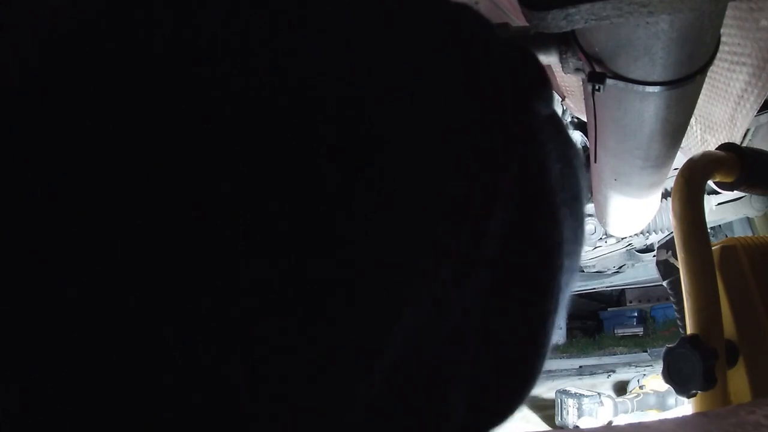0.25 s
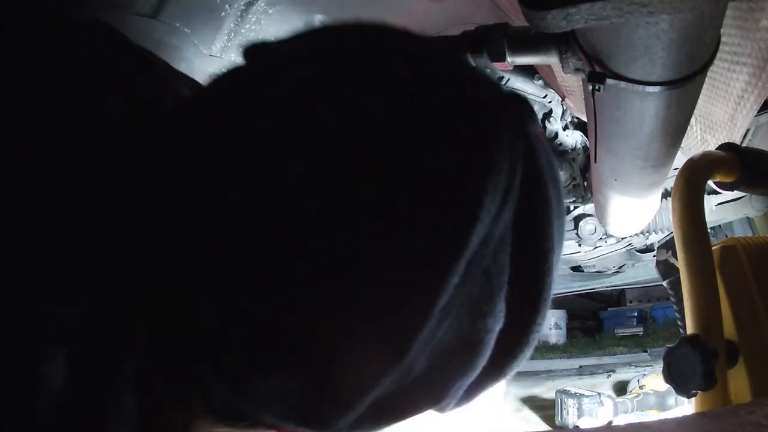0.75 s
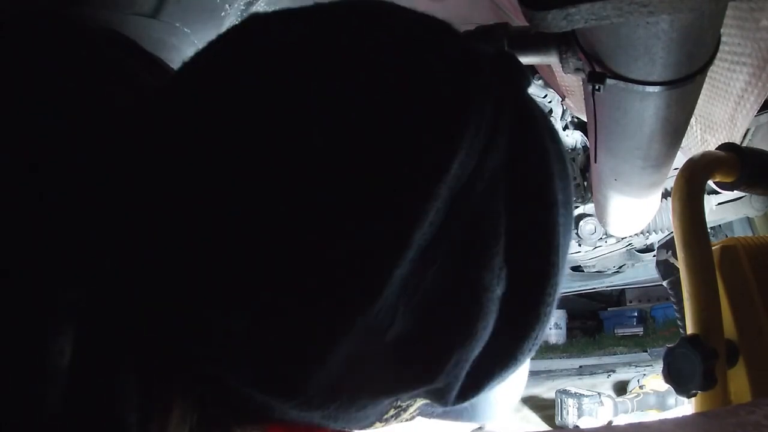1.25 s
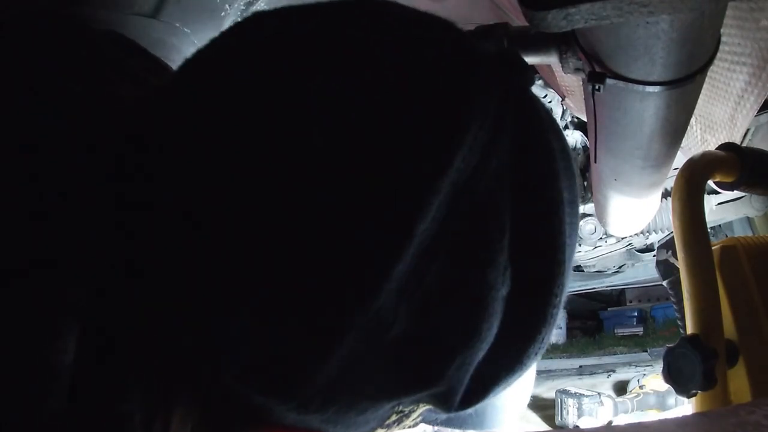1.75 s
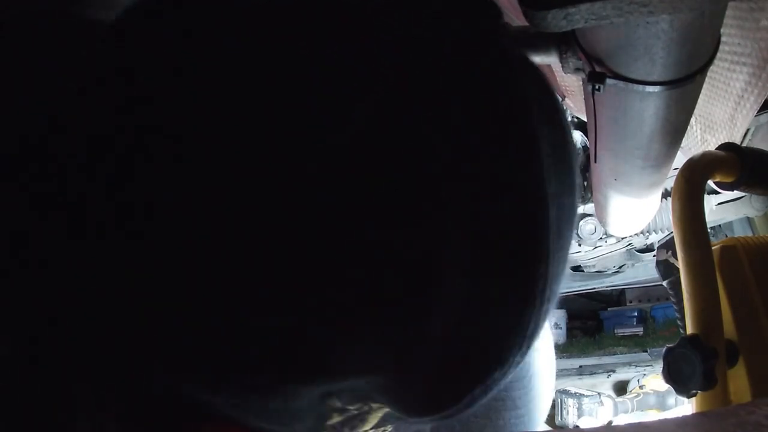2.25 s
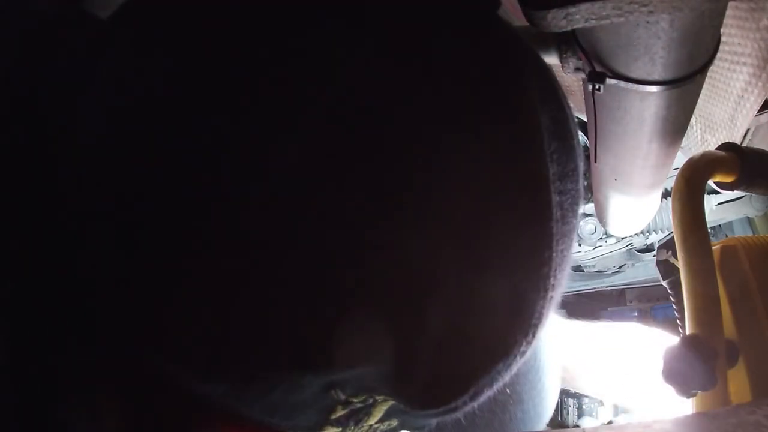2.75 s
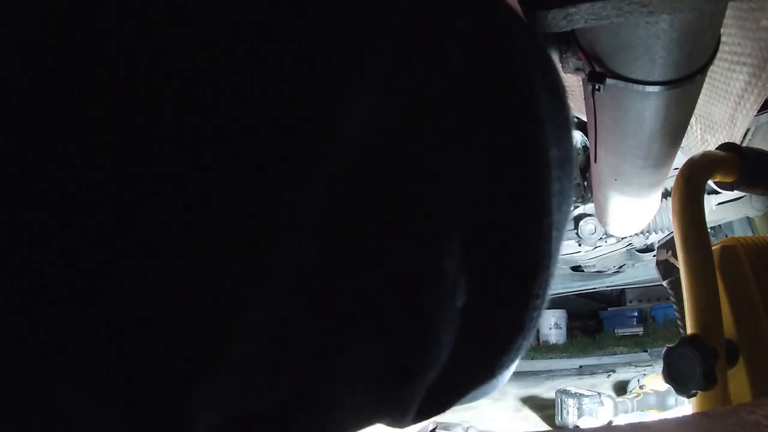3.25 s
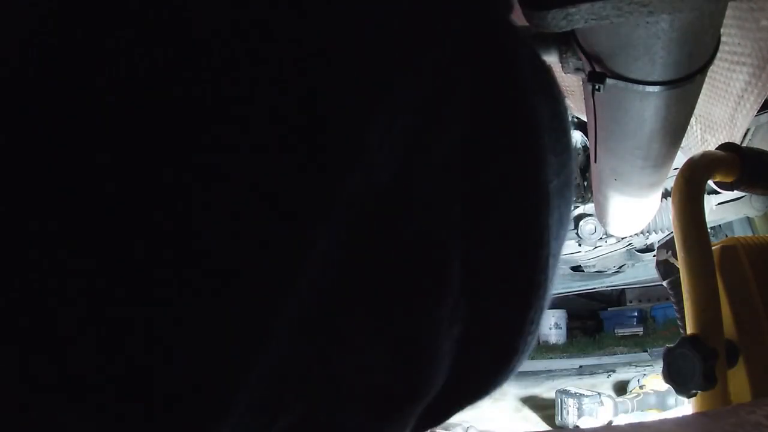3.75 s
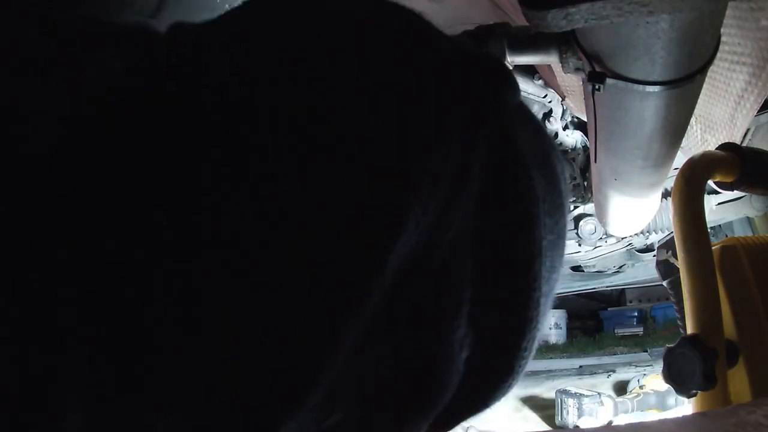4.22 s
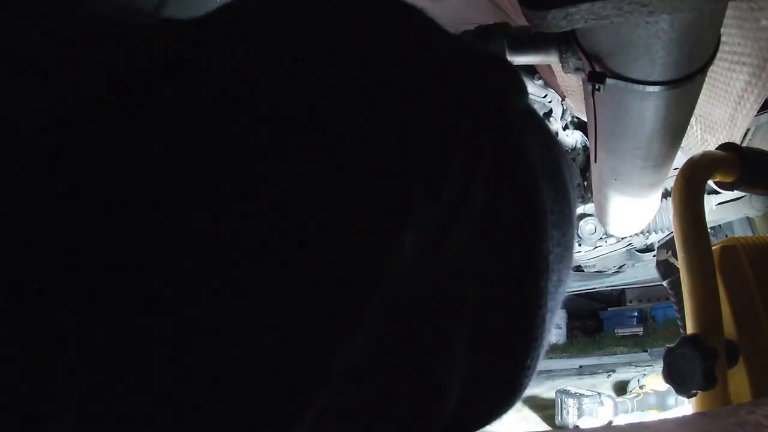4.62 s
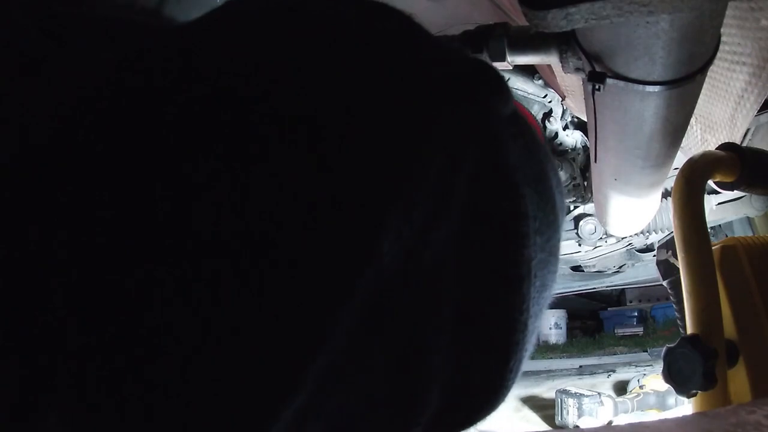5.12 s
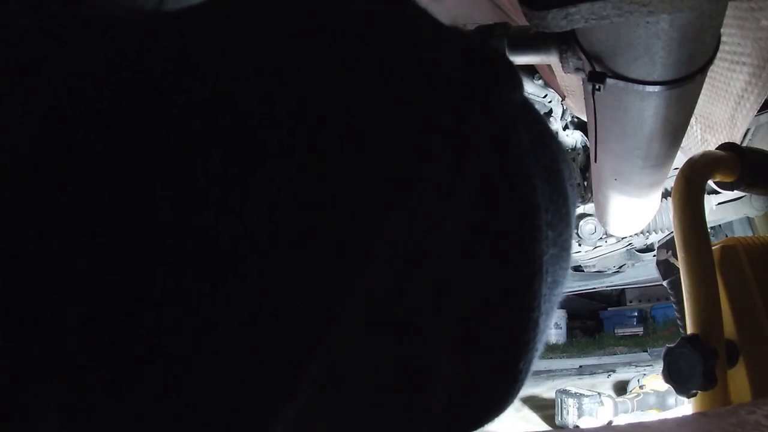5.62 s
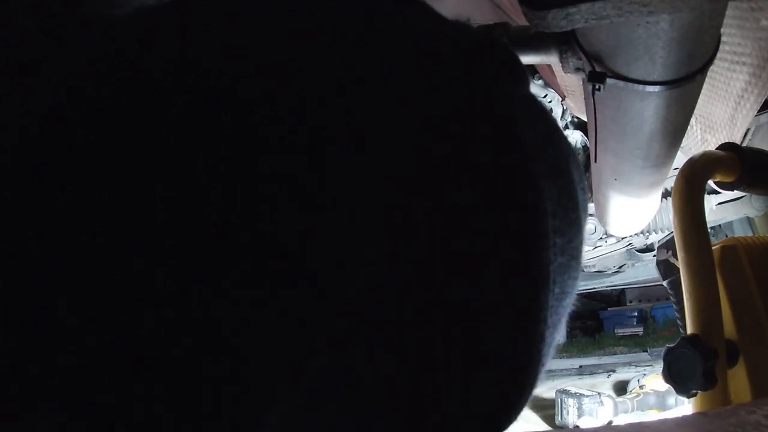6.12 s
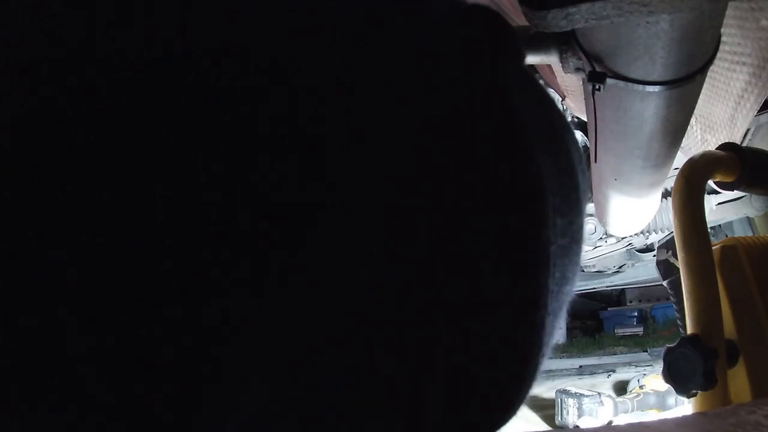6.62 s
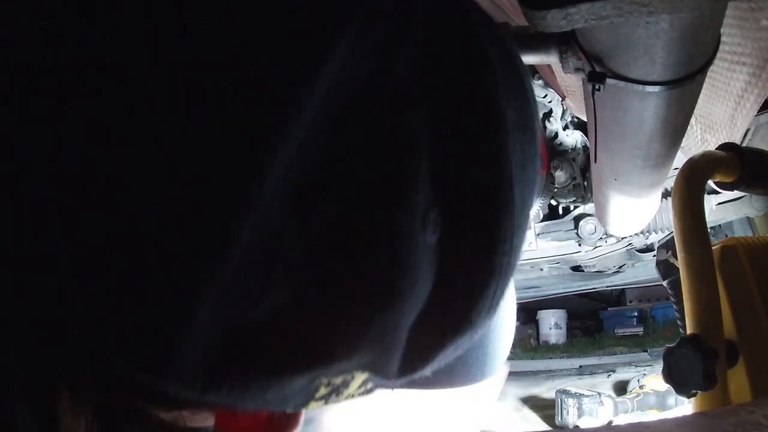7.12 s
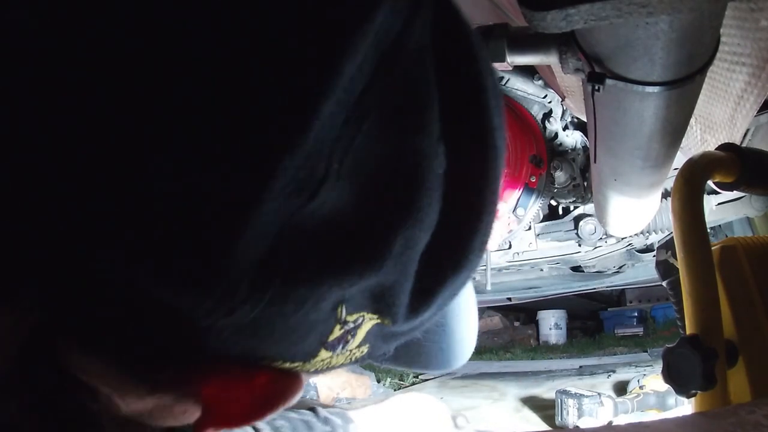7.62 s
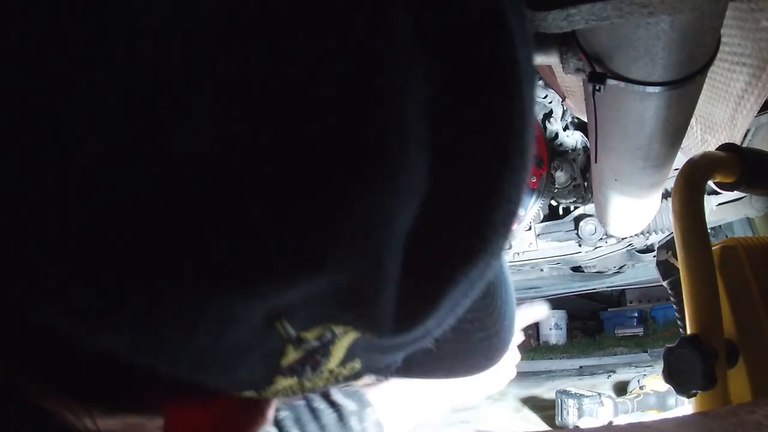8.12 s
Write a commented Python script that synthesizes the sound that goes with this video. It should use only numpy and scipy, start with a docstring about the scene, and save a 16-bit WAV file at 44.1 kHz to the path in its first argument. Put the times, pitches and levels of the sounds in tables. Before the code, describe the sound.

A heavy metal part scrapes and bangs into place under a car, then a wrench pings on a fitting over low engine drone.

```python
"""A heavy part is shifted and knocked into place under a car in a garage, then a wrench taps on a fitting.
Blows are sums of decaying modes and short noise bursts; sliding, grinding and cloth are shaped noise.
Near surfaces throw the taps straight back, and the garage adds a short diffuse tail.
Far engines are low harmonic tones, one sinking slowly in pitch, another passing and changing gear,
over filtered noise for ebbing traffic rumble and faint air noise."""
import sys
import numpy as np
from scipy import signal
from scipy.fft import rfft, irfft
from scipy.io import wavfile
from scipy.ndimage import uniform_filter1d

SR = 44100
rng = np.random.default_rng(int(sys.argv[2]) if len(sys.argv) > 2 else 0)


def unload_audio(sound):
    """Save the sound as a 16-bit wav file, at the path given as the first command line argument."""
    columns = np.transpose(np.atleast_2d(sound))
    # keep every value between -1 and 1, then stretch to whole-number steps
    steps = np.round(np.clip(columns, -1, 1) * 32767)
    wavfile.write(sys.argv[1], SR, steps.astype(np.int16))


N = 369305
TIME = np.arange(N) / SR  # [s]
AGE = np.arange(SR // 2) / SR  # time since a blow [s]
ATTACK_SAMPLES = 441  # the first 10 ms of a blow, where its level is set

# far droning engine: (time [s], level before DRONE_TRIM_DB [dB])
DRONE_LEVEL = [(0.1, -36.5), (0.42, -29), (2.56, -31), (2.59, -37.5), (3.99, -25.5), (5.4, -30.5),
               (6.83, -43), (6.87, -36), (8.37, -37.5)]
DRONE_TRIM_DB = -1
DRONE_HZ, SAG_HZ_PER_S = 77.4, 1.14  # it slows evenly
# passing vehicle: it revs up, drops into the next gear and picks up slowly
LOW_GEAR_HZ, LOW_GEAR_HZ_PER_S = 107.7, 12.8
SHIFT_S, SHIFT_LENGTH_S = 3.2, 1
HIGH_GEAR_HZ, HIGH_GEAR_HZ_PER_S = 99.1, 1.3
NEAREST_S, PASS_S = 3.936, 0.15  # when it is nearest; time from there to 3 dB less
PASS_DB, PASS_RUMBLE_DB = -30, -34.5  # what nearness adds to its note and to the rumble, at most
FAR_DB = -43.5  # its note from afar, at the start
TRAFFIC_DB, AIR_DB = -32, -53.5  # rumble and air noise at the start
TRAFFIC_FADE_DB_PER_S, AIR_FADE_DB_PER_S = 1.15, 0.95  # both ebb as the traffic moves off
# spectra of the traffic rumble and of the air noise: (frequency [Hz], level [dB])
RUMBLE_COLOUR = [(20, -34), (40, -13), (55, -2), (92, 8.5), (125, -2), (155, 0.5), (200, -8.5),
                 (270, -20.5), (400, -30.5), (800, -34.5), (2000, -86.5)]
AIR_COLOUR = [(180, -15.5), (300, -3.5), (620, -20.5), (1000, -11), (1600, -20.5), (3000, -33.5),
              (5500, -41.5), (8000, -63), (10000, -51), (15000, -65.5)]

# strokes of a sleeve: (start [s], end [s], level [dB], treble against body [dB])
BRUSHES = [(-.5, .58, -54.5, -52), (0.534, 0.71, -49.5, -34), (0.602, 1.7, -54.5, -43),
           (1.064, 1.266, -50, -28), (2.08, 2.59, -62.5, -12.5), (4.9, 5.113, -59.5, -24),
           (6.47, 6.623, -63, -14), (7.018, 7.985, -50, -13), (7.75, 8.35, -66.5, -12.5),
           (7.18, 7.33, -46.5, -13.5), (7.385, 7.704, -46, -14), (8.16, 8.276, -62.5, -5),
           (8.247, 8.54, -55, -8)]
# pushes that slide the part: (start [s], end [s], level [dB], treble against body [dB])
SLIDES = [(1.429, 1.62, -35.5, -28), (1.613, 1.77, -40.5, -25.5), (1.773, 1.92, -37.5, -32.5),
          (1.898, 2.097, -38, -22.5), (2.049, 2.131, -26, -25), (2.1, 2.247, -51, -16)]
# spectra of cloth and of sliding metal: (frequency [Hz], level [dB])
CLOTH_COLOUR = [(150, -8), (330, 1), (550, -11), (800, -0.5), (1300, -10.5), (1800, -8.5), (3500, -20),
                (6500, -23.5), (8000, -31.5), (10300, -26), (11800, -43.5), (15000, -42)]
SCRAPE_COLOUR = [(150, -18.5), (250, -7), (335, 16), (450, 4), (600, -7.5), (720, 7), (820, 6.5),
                 (1000, -3), (1200, -8.5), (2000, -14), (3000, -12.5), (4400, -24.5), (6700, -21),
                 (8000, -34.5), (10000, -28.5), (12000, -44), (15000, -54)]
# each catch of a rubbing surface sounds in one of these bands: (from [Hz], to [Hz])
CATCH_BANDS = [(30, 600), (600, 1300), (1300, 2300), (2300, 3400), (3400, 5000), (5000, 7500),
               (7500, 17000)]

# light touches of small steel parts: (time [s], level [dB], centre of their ring [Hz])
TICKS = [(.06, -52, 2470), (1.722, -47.5, 2820), (1.738, -47.5, 1670), (1.856, -38.5, 2970),
         (1.905, -48, 2530), (1.935, -46.5, 3470), (1.954, -50, 2430), (2.043, -40.5, 2600),
         (2.551, -53, 5200), (5.802, -53, 1960), (5.916, -62.5, 2030)]
TICK_T60_S, TICK_SKIRT_DB = 0.1, -14.5  # decay; level a third of an octave from the centre

# soft low thumps: (time [s], length [s], level [dB])
NUDGES = [(0.52, 0.21, -36), (1.4, 1, -39), (7.554, 0.48, -38.5)]
# spectrum of the thumps: (frequency [Hz], level [dB])
NUDGE_COLOUR = [(15, -11.0), (40, -8.0), (65, -11.0), (150, -16.0), (500, -49.0), (2000, -98.5)]

# dull blows of the heavy part: (time [s], level [dB], brightness [dB per octave])
KNOCKS = [(0.536, -39, 5), (0.854, -31, -5.5), (1.435, -49, 0), (1.502, -31, -1.5), (1.529, -18.5, 3),
          (1.578, -23, -11), (1.605, -28, -1.5), (1.62, -20, 2.5), (1.712, -30, 2), (1.736, -31, -3),
          (1.816, -29.5, -3), (1.973, -21.5, 4.5), (2.5288, -9.5, 1), (2.599, -17, -1.5),
          (2.7205, -23.5, 1.5), (2.762, -17.5, 11), (2.7759, -20.5, 1), (2.809, -36.5, 9),
          (2.893, -17.5, 1), (2.983, -31.5, -1.5), (7.214, -35.5, 6.5), (7.305, -29, 4),
          (7.646, -36.5, 2.5), (7.719, -32, -1.5)]
# spectrum of a dull blow: (frequency [Hz], level [dB])
KNOCK_COLOUR = [(50, -18), (110, 0), (170, 4.5), (230, -3), (330, 7.5), (490, -5.5), (660, -13),
                (760, -3.5), (1020, -15), (1500, -28.5), (2500, -40.5), (4000, -58.5), (8000, -76),
                (15000, -100)]
# body resonances of the part: (frequency [Hz], level [dB], T60 [s])
PART_MODES = [(172, -1, .25), (235, -5, .38), (310, -4, .16), (326, 0, .16), (420, -7, .16), (474, -1, .18),
              (558, -6, .22), (724, -5, .16), (775, -8, .09), (836, -7, .13), (1015, -8, .1),
              (1095, -12, .07)]
KNOCK_T60_S = 0.064

# hard contacts of metal on metal: (time [s], level [dB], brightness [dB per octave], T60 of the crack [s])
CLACKS = [(1.572, -35.5, 0.5, 0.19), (1.6005, -19, -1, 0.082), (1.855, -35.5, 0, 0.084),
          (2.158, -28.5, 1, 0.066), (2.529, -50, 13.5, 0.11), (2.549, -45.5, 6.5, 0.059),
          (2.601, -57, 15, 0.13), (2.7207, -27.5, 4, 0.062), (2.7434, -38, 6.5, 0.047),
          (2.762, -36, 7, 0.12), (2.7768, -24.5, -3.5, 0.013), (2.894, -34, -0.5, 0.096),
          (2.9101, -28.5, 6.5, 0.045), (2.99, -46.5, 0.5, 0.089), (7.188, -43, 3, 0.073),
          (7.217, -49, -5, .045), (7.306, -43, -10, 0.063), (7.45, -40.5, -4, 0.063),
          (7.526, -45, 7, 0.077), (7.721, -49, 4, 0.14)]
# spectrum of a hard contact: (frequency [Hz], level [dB])
CLACK_COLOUR = [(100, -49), (400, 13), (600, 8), (800, 12), (1200, 6.5), (1900, -0.5), (2600, 3),
                (4200, -8), (5500, -12.5), (6800, -10.5), (8000, -28), (10000, -19.5), (12000, -38),
                (15000, -43.5)]
# edge resonances of the part, before detuning: (frequency [Hz], level [dB], T60 [s])
CLACK_MODES = [(1020, 1, .1), (1545, -4, .13), (1728, 0, .09), (2008, -5, .11), (2430, -4, .11),
               (2640, -1, .095), (3010, -3, .1), (3429, -6, .08), (5250, -10, .07), (6750, -8, .06),
               (9800, -16, .05)]
EDGE_DETUNE = .025  # standard deviation, as a fraction of each frequency

# a steel tool that rings when touched, until a hand stops it: (time [s], level [dB], free time [s])
CLINKS = [(1.602, -27, 0.11)]
# resonances of that tool: (frequency [Hz], level [dB], T60 [s])
TOOL_MODES = [(1712, -5, .11), (2272, -3, .7), (2392, -13, .2), (3535, 0.5, .17), (4129, -17, .15),
              (5035, -1, .13), (9383, -23, .18), (10655, -29, .18)]
GRAB_T60_S = 0.036  # extra decay once the hand stops it

# a metal edge grinds along another: (time [s], length [s], level [dB])
GRINDS = [(1.846, 0.059, -50.5), (2.916, 0.094, -57)]
# spectrum of the grinding: (frequency [Hz], level [dB])
GRIND_COLOUR = [(300, -28), (2100, -19), (2420, 0), (2700, -4), (3500, -24), (5400, -18), (14000, -48)]

# the part lands flat and its face swings: (time [s], level before decay and onset [dB], pitch [Hz])
SLAPS = [(2.530, -0.5, 890), (2.7613, -10.5, 1040), (2.7766, -4, 970)]
SLAP_T60_S = 0.012

# brief pure tones of ringing steel, as when the wrench is set on the fitting:
# (time [s], length [s], pitch [Hz], peak level [dB])
STEEL_TONES = [(2.885, 0.055, 2550, -51), (2.949, 0.083, 2344, -65), (2.994, 0.015, 2400, -43),
               (5.223, .13, 726, -55.5)]

# wrench on the fitting: (time [s], blow level [dB], brightness [dB per octave],
# partial that the spot struck brings out [Hz], ring level [dB], free time [s])
TAPS = [(4.561, -39, -7.5, 3330, -27.5, 0.057), (4.613, -48.5, -9.5, 1140, -31, 0.022),
        (4.694, -62, -7.5, 1140, -44, 0.12), (4.779, -49, -6, 1150, -36, 0.11),
        (4.874, -52, -9, 3280, -40.5, 0.088), (5.028, -58.5, -5.5, 1140, -46.5, .05),
        (5.137, -31, 1.5, 5070, -24.5, 0.046), (5.202, -51, -4.5, 3320, -46.5, 0.038),
        (5.361, -62.5, -4, 2370, -62, 0.047), (5.659, -27.5, -2, 1810, -25.5, 0.052),
        (5.916, -64.5, -8.5, 2330, -52.5, 0.032), (6.078, -31.5, -2.5, 1336, -20.5, 0.03),
        (6.118, -38, -4.5, 1150, -29.5, 0.057), (6.33, -39.5, -2.5, 2400, -31.5, 0.047)]
# spectrum of a tap: (frequency [Hz], level [dB])
TAP_COLOUR = [(100, -24), (330, -8), (520, -17.5), (720, -5.5), (890, -12.5), (1100, 0.5), (1950, 2.5),
              (2600, -2.5), (3800, -7.5), (5000, -6.5), (6500, -8.5), (8000, -19), (10000, -16),
              (12500, -38), (15000, -43.5)]
# resonances of the wrench and of the fitting: (frequency [Hz], level [dB], T60 [s])
WRENCH_MODES = [(1112, -7, .1), (1143, 4, .19), (1325, -8, .1), (1405, -7, .1), (1508, -5, .13),
                (1676, -4, .2), (2020, -9, .08), (2132, -7, .1), (2376, 1, .19), (3140, -12, .1),
                (3305, -13, .11), (3362, -9, .12), (4090, -13, .08), (4462, -7, .095), (4938, -6, .095),
                (5320, -12, .08), (6160, -11, .08), (6345, -7, .09), (6944, -17, .08)]
FITTING_MODES = [(2545, -2, .32), (2627, -1, .33), (2681, 0, .31), (2719, -3, .35), (2785, -1, .32),
                 (2832, 0, .28), (2929, -3, .3)]
TAP_T60_S, GRIP_T60_S = 0.091, .17  # decay of the blow; extra decay of the wrench once gripped
SPOT_DB, SPOT_OCTAVES = 9.5, 0.19  # boost of the partial at the spot struck, and its half-width to 1/e
FITTING_DB = -16.5  # shimmer of the fitting against the blow
# near surfaces that throw the taps back: (delay [s], gain [linear])
BOUNCES = [(.0027, .35), (.0106, .5)]
# each bounce loses some treble: (frequency [Hz], level [dB])
BOUNCE_COLOUR = [(1000, 2.5), (5000, 0), (12000, -19.5)]

# decay of the diffuse tail: (frequency [Hz], T60 [s])
GARAGE = [(100, 0.26), (300, 0.22), (800, 0.09), (2700, 0.096), (6000, 0.027), (12000, 0.064)]
EDGE_HZ = 15000  # upper band edge


def amp(db):
    """Amplitude ratio of a level in decibels."""
    return 10 ** (np.asarray(db) / 20)


def unit(x):
    """Normalises a signal to rms 1."""
    return x / np.sqrt(np.mean(x ** 2) + 1e-20)


def read(points, hz):
    """Interpolates a spectrum on a logarithmic frequency axis."""
    f, value = np.transpose(points)
    return np.interp(np.log(hz + 1), np.log(f), value)


def add(mix, s, sound):
    """Superposes a sound on the mix from time s."""
    part = mix[max(round(s * SR), 0):][:len(sound)]
    part += sound[:len(part)]


def colour(x, points, tilt_db=0):
    """Minimum-phase filter: the log spectrum, tilted by dB per octave about 1 kHz, fixes the phase."""
    hz = abs(np.fft.fftfreq(4096, 1 / SR))
    tilt = tilt_db * np.log2(np.maximum(hz, 300) / 1000)  # no further tilt below 300 Hz
    log_gain = np.log(amp(read(points, hz) + tilt))
    taps = np.fft.ifft(np.exp(np.conj(signal.hilbert(log_gain)))).real
    return signal.oaconvolve(x, taps[:len(taps) // 2])[:len(x)]


def dying(t60):
    """Exponential decay by 60 dB in t60, as under viscous damping."""
    return np.exp(-np.log(1000) * AGE / np.maximum(t60, .005))


def held(free, t60):
    """Damping by a hand: no extra loss during the free time, then 60 dB more in each t60."""
    return amp(-60 * np.maximum(AGE - free, 0) / max(t60, .01))


def struck(x):
    """Normalises a blow to rms 1 over its attack."""
    return x / np.sqrt(np.mean(x[:ATTACK_SAMPLES] ** 2) + 1e-20)


def crack(scatter, points, tilt_db, t60, direct, size):
    """Impact: a direct click, then dense short-lived modes and near reflections, in the contact's colour."""
    burst = scatter * dying(t60) * (1 - np.exp(-AGE / .001))
    burst[0] = direct * np.linalg.norm(burst)
    spectrum = rfft(burst)
    # flatten the broad hills of the burst, so that only those of the colour remain
    hills = np.sqrt(uniform_filter1d(abs(spectrum) ** 2, size=size))
    even = irfft(spectrum / hills, len(AGE))
    first_half = AGE < AGE[-1] / 2
    return struck(colour(even * first_half, points, tilt_db))


def ring(modes, tilt_db, spot_hz=1000, spot_db=0):
    """Modal decay: each blow shares its force differently among the modes, favouring those near spot_hz."""
    hz, db, t60 = np.transpose(modes)[:, :, None]
    favour_db = spot_db * np.exp(-(np.log2(hz / spot_hz) / SPOT_OCTAVES) ** 2)
    uneven_db = 1.2 * rng.standard_normal(hz.shape)
    size = amp(db + favour_db + tilt_db * np.log2(hz / 1000) + uneven_db)
    partials = size * dying(t60) * np.sin(2 * np.pi * (hz * AGE + rng.random(hz.shape)))
    onset = 1 - np.exp(-AGE / 0.0035)
    return partials.sum(0) / np.sqrt(np.sum(size ** 2) / 2) * onset


def friction(catches_per_s, catch_db, catch_t60, steady):
    """Friction noise: an even hiss (steady is its share of the power) and tiny uneven catches in bands."""
    out, noise = np.zeros(N), rng.standard_normal(N)
    fade = amp(-120 / (catch_t60 * SR))  # power factor per sample
    for band in CATCH_BANDS:
        catches = np.zeros(N)
        at = rng.integers(0, N, int(catches_per_s * N / SR))
        catches[at] = amp(catch_db * np.minimum(rng.exponential(1, len(at)), 3))
        power = signal.lfilter([1], [1, -fade], catches ** 2)
        grip = np.sqrt(steady + (1 - steady) * power / power.mean())
        band_pass = signal.butter(3, band, "band", fs=SR, output="sos")
        out += signal.sosfilt(band_pass, grip * noise)
    return out


def rub(hiss, strokes, arch, split_hz=4500):
    """Friction in strokes: each swells and fades in one arch, and overlapping strokes add in power."""
    low_pass = signal.butter(4, split_hz, "low", fs=SR, output="sos")
    high_pass = signal.butter(4, split_hz, "high", fs=SR, output="sos")
    body, treble = unit(signal.sosfilt(low_pass, hiss)), unit(signal.sosfilt(high_pass, hiss))
    body_power, treble_power = np.zeros((2, N))
    for start, end, db, treble_db in strokes:
        during = (TIME > start) & (TIME < end)
        progress = (TIME[during] - start) / (end - start)
        swell = amp(db) * abs(np.sin(np.pi * progress)) ** arch
        body_power[during] += swell ** 2
        treble_power[during] += (amp(treble_db) * swell) ** 2
    return body * np.sqrt(body_power) + treble * np.sqrt(treble_power)


def strokes_of_noise(strokes, points):
    """Filtered noise: each stroke swells and fades under a raised-cosine envelope."""
    out = np.zeros(N)
    for s, length, db in strokes:
        noise = colour(rng.standard_normal(int(length * SR)), points)
        add(out, s, amp(db) * unit(noise * signal.windows.hann(len(noise))))
    return out


def engine(hz, second_db, third_db, waver):
    """Harmonic tone: a far exhaust keeps only its lowest harmonics, each wavering in level."""
    phase = 2 * np.pi * np.cumsum(hz) / SR
    knots = np.linspace(0, TIME[-1], 70)
    out = np.zeros(N)
    for k, harmonic_db in enumerate([0, second_db, third_db], 1):
        fading = 1 + waver * np.interp(TIME, knots, rng.standard_normal(len(knots)))
        out += amp(harmonic_db) * fading * np.sin(k * phase)
    return unit(out)


def droning_engine():
    """Harmonic tone whose pitch sinks linearly as the engine slows."""
    note = engine(DRONE_HZ - SAG_HZ_PER_S * TIME, second_db=-17, third_db=-29, waver=.08)
    return note * amp(DRONE_TRIM_DB + np.interp(TIME, *np.transpose(DRONE_LEVEL)))


def nearness():
    """Spherical spreading: amplitude falls as the inverse distance from a straight path, 1 when nearest."""
    return 1 / np.hypot(1, (TIME - NEAREST_S) / PASS_S)


def traffic_ebb():
    """Steady fall in level, linear in decibels, as the traffic moves off."""
    return amp(-TRAFFIC_FADE_DB_PER_S * TIME)


def gear_change():
    """Pitch follows engine speed: a climb in low gear, a glide down, a slow climb in high gear."""
    low = LOW_GEAR_HZ + LOW_GEAR_HZ_PER_S * np.minimum(TIME, SHIFT_S)
    high = HIGH_GEAR_HZ + HIGH_GEAR_HZ_PER_S * (TIME - SHIFT_S - SHIFT_LENGTH_S)
    return low + (high - low) * np.clip((TIME - SHIFT_S) / SHIFT_LENGTH_S, 0, 1)


def passing_vehicle():
    """Harmonic tone that swells with nearness, over an ebbing far part."""
    note = engine(gear_change(), second_db=-30, third_db=-40, waver=.25)
    return note * (amp(PASS_DB) * nearness() + amp(FAR_DB) * traffic_ebb())


def traffic_rumble():
    """Low filtered noise: incoherent sources, the traffic and the passing vehicle, add in power."""
    level = np.hypot(amp(TRAFFIC_DB) * traffic_ebb(), amp(PASS_RUMBLE_DB) * nearness())
    return level * unit(colour(rng.standard_normal(N), RUMBLE_COLOUR))


def air_noise():
    """Faint filtered noise that ebbs linearly in decibels."""
    level = amp(AIR_DB - AIR_FADE_DB_PER_S * TIME)
    return level * unit(colour(rng.standard_normal(N), AIR_COLOUR))


def clothes():
    """Cloth friction: dense small catches as the sleeves brush."""
    hiss = friction(catches_per_s=200, catch_db=3.5, catch_t60=.025, steady=.5)
    return rub(colour(hiss, CLOTH_COLOUR), BRUSHES, arch=0.84)


def small_parts():
    """Modal cluster: each light touch rings short-lived modes around one centre."""
    out = np.zeros(N)
    for s, db, hz in TICKS:
        hump = [(hz / 8, -50), (hz / 1.26, TICK_SKIRT_DB), (hz, 0),
                (hz * 1.26, TICK_SKIRT_DB), (hz * 2.5, -42), (hz * 8, -65)]
        scatter = rng.standard_normal(len(AGE))
        add(out, s, amp(db) * crack(scatter, hump, 0, TICK_T60_S, direct=0.14, size=200))
    return out


def nudges():
    """Soft thumps: low filtered noise in slow swells."""
    return strokes_of_noise(NUDGES, NUDGE_COLOUR)


def knocks(ring_db=-8.5):
    """Dull impact: the blow excites the body modes of the heavy part."""
    out = np.zeros(N)
    for s, db, tilt in KNOCKS:
        scatter = rng.standard_normal(len(AGE))
        blow = crack(scatter, KNOCK_COLOUR, tilt, KNOCK_T60_S, direct=0.47, size=110)
        add(out, s, amp(db) * (blow + amp(ring_db) * ring(PART_MODES, tilt)))
    return out


def sliding():
    """Dry friction: the part slides in pushes, catching unevenly."""
    hiss = friction(catches_per_s=130, catch_db=3, catch_t60=.035, steady=.25)
    return rub(colour(hiss, SCRAPE_COLOUR), SLIDES, arch=0.41)


def clacks(ring_db=-6):
    """Hard impact: metal on metal excites the edge modes, tuned a little differently at each contact."""
    out = np.zeros(N)
    for s, db, tilt, t60 in CLACKS:
        scatter = rng.standard_normal(len(AGE))
        blow = crack(scatter, CLACK_COLOUR, tilt, t60, direct=0.14, size=400)
        edge = [(hz * (1 + EDGE_DETUNE * rng.standard_normal()), level, decay)
                for hz, level, decay in CLACK_MODES]
        add(out, s, amp(db) * (blow + amp(ring_db) * ring(edge, tilt)))
    return out


def loose_tool():
    """Free modal ringing of a touched steel tool, damped when a hand catches it."""
    out = np.zeros(N)
    for s, db, free in CLINKS:
        add(out, s, amp(db) * ring(TOOL_MODES, 0) * held(free, GRAB_T60_S))
    return out


def grinding():
    """Rough contact: one metal edge grinding along another gives short swells of noise."""
    return strokes_of_noise(GRINDS, GRIND_COLOUR)


def slaps():
    """Heavily damped oscillation: the flat face gives a few quick swings on landing."""
    out = np.zeros(N)
    for s, db, hz in SLAPS:
        onset = 1 - np.exp(-AGE * hz)
        add(out, s, amp(db) * dying(SLAP_T60_S) * np.sin(2 * np.pi * hz * AGE) * onset)
    return out


def steel_tones():
    """Single-mode vibration: ringing steel gives a brief pure tone that swells and fades."""
    out = np.zeros(N)
    for s, length, hz, db in STEEL_TONES:
        t = AGE[AGE < length]
        swell = np.sqrt(np.sin(np.pi * t / length))
        add(out, s, amp(db) * swell * np.sin(2 * np.pi * hz * t))
    return out


def wrench_taps():
    """Impact of two resonators: the wrench pings until the grip damps it, the fitting shimmers on."""
    out = np.zeros(N)
    shared = rng.standard_normal(len(AGE))  # what all taps have in common
    for s, db, tilt, spot_hz, ring_db, free in TAPS:
        scatter = shared + .7 * rng.standard_normal(len(AGE))
        blow = crack(scatter, TAP_COLOUR, tilt, TAP_T60_S, direct=.05, size=200)
        add(out, s, amp(db) * blow)
        for delay, gain in BOUNCES:
            add(out, s + delay, gain * amp(db) * colour(blow, BOUNCE_COLOUR))
        ping = ring(WRENCH_MODES, tilt, spot_hz, SPOT_DB) * held(free, GRIP_T60_S)
        add(out, s, amp(ring_db) * ping)
        add(out, s, amp(db + FITTING_DB) * ring(FITTING_MODES, 0))
    return out


def garage(x):
    """Diffuse reverberation: a noise tail whose decay time depends on frequency, longest in the bass."""
    hz, t, z = signal.stft(rng.standard_normal(len(AGE)), SR, nperseg=256)
    decay = amp(-60 * t / read(GARAGE, hz)[:, None])
    tail = signal.istft(z * decay, SR)[1][:len(AGE)]
    tail *= 1 - np.exp(-AGE / 0.0047)  # gradual build-up
    return signal.oaconvolve(x, tail / np.linalg.norm(tail))[:N]


def scene(wet_db=-17):
    """Superposition of the work, its reverberation and the sounds from outside."""
    outside = droning_engine() + passing_vehicle() + traffic_rumble() + air_noise()
    handling = clothes() + small_parts() + nudges() + sliding() + grinding()
    blows = knocks() + clacks() + loose_tool() + slaps() + steel_tones() + wrench_taps()
    work = handling + blows
    return (work + amp(wet_db) * garage(work) + outside)[None]


def record(dry):
    """Band limitation by a linear-phase low-pass filter."""
    low_pass = signal.firwin(511, EDGE_HZ, window=("kaiser", 9), fs=SR)
    return signal.oaconvolve(dry, low_pass[None], "same")


dry = scene()
out = record(dry)
unload_audio(out)
```